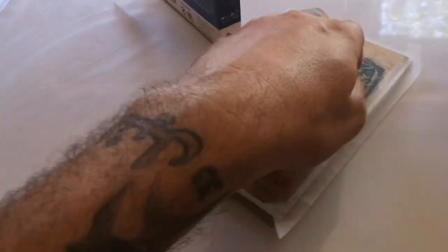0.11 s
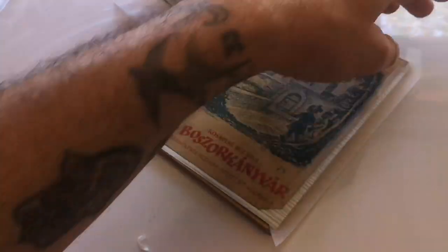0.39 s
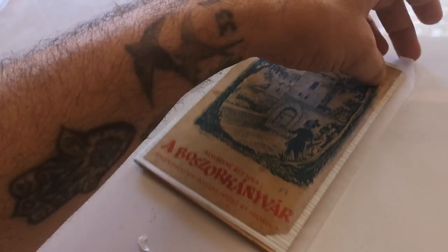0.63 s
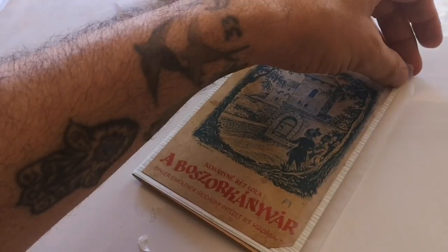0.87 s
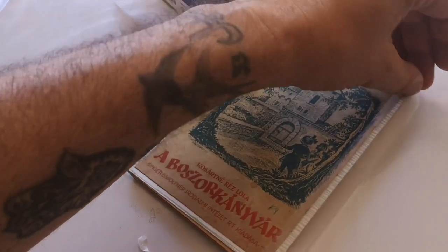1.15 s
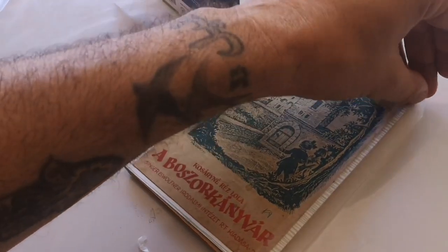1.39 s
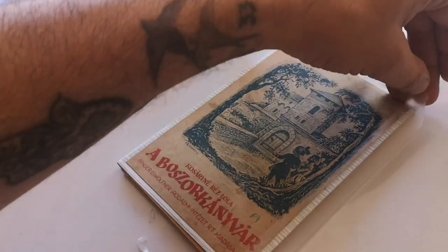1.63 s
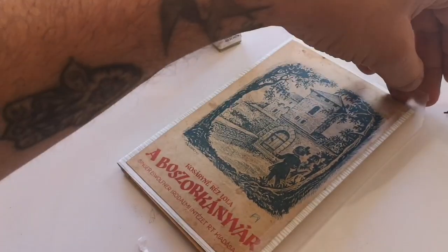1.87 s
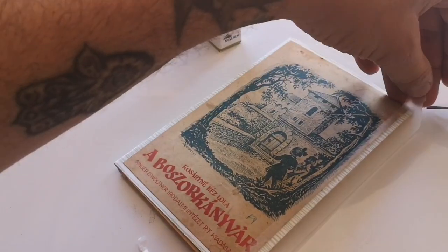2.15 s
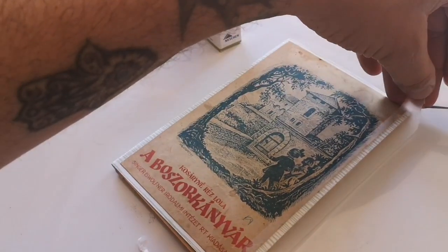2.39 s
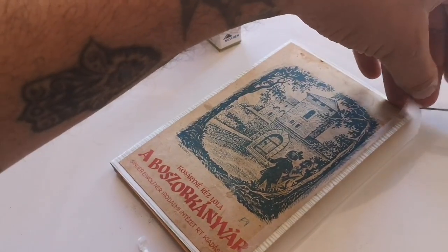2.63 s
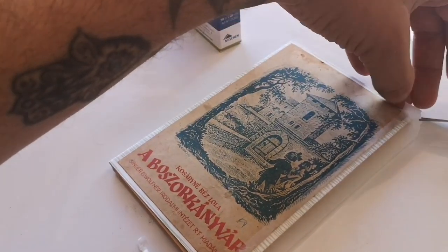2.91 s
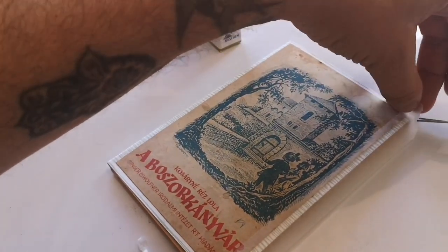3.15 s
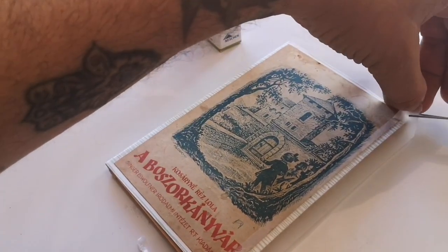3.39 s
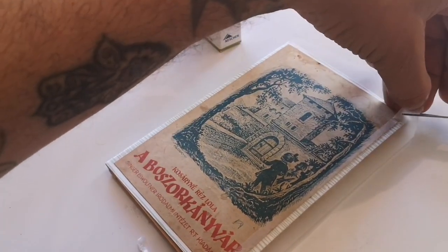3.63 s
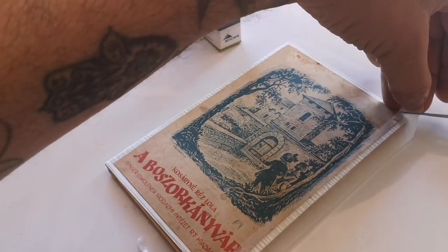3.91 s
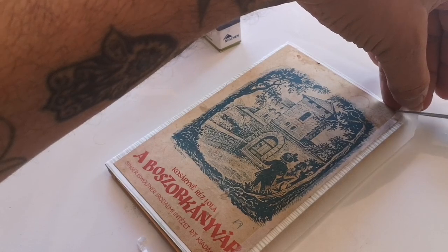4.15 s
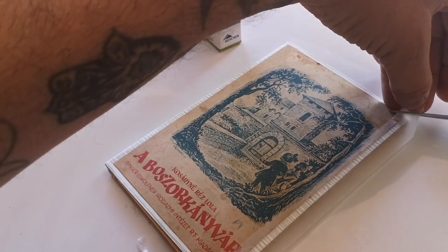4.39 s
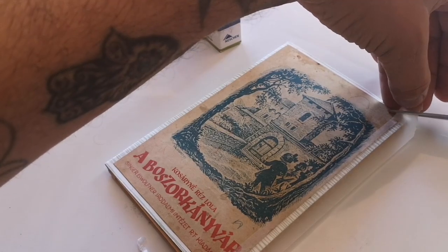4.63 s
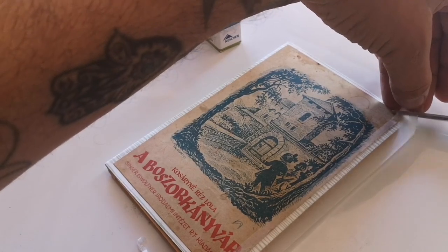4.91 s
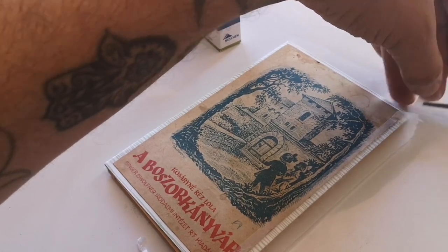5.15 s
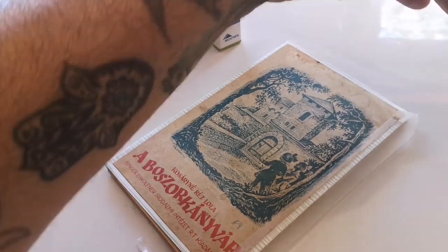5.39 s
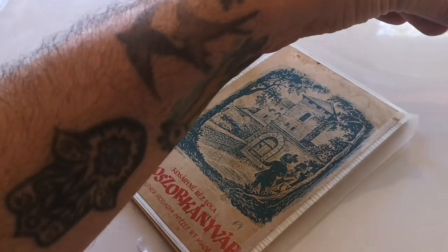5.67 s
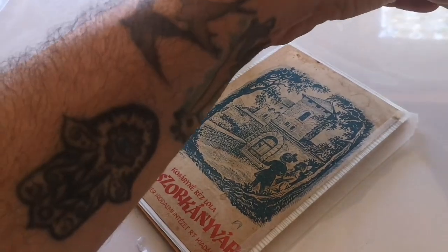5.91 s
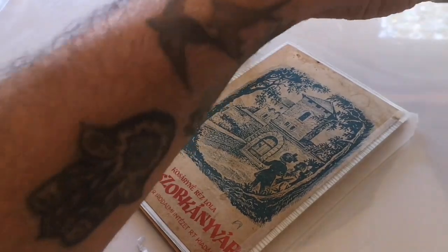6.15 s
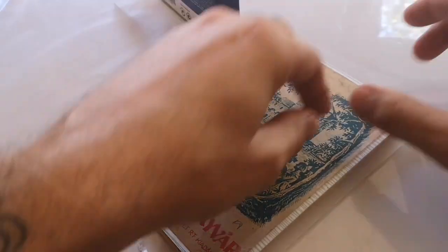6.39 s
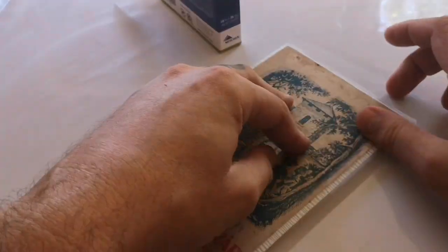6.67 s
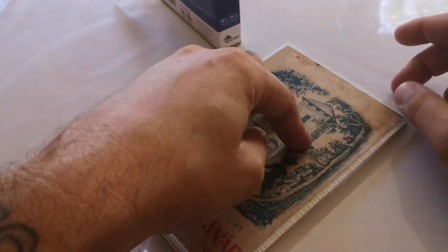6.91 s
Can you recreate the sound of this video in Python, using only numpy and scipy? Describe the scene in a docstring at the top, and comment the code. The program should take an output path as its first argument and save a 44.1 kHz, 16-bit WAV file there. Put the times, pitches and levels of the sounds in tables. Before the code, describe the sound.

Hands knock and shift a covered book on a hard table, then near silence, small sticky tape ticks, and another short flurry of knocks.

```python
"""Ticks and knocks over a steady quiet hiss and a wavering hum: hands fold paper tape round a book
on a hard table, close to a two-port microphone in a small room. Knocks ring modes of table, cover
and edge; glue ticks are short noise cracks; hand strokes swell rumble, slide and rustle noise.
Near sounds get a noise-tail room; behind lie shaped-noise hiss, narrow-band hum, dull far thumps."""
import sys
import numpy as np
from scipy import signal
from scipy.fft import rfft, irfft
from scipy.io import wavfile
from scipy.ndimage import uniform_filter1d

SR = 44100
rng = np.random.default_rng(int(sys.argv[2]) if len(sys.argv) > 2 else 0)


def volts(x):
    """Linear amplitude factor 10**(x/20) for a level x in dB, scalar or array-like."""
    e = np.asarray(x, float) / 20
    return 10 ** e


def put_to_file(sound):
    """Save the sound as 16-bit audio at rate SR, in the file named by the first command-line argument."""
    columns = np.atleast_2d(sound).T  # one column per channel
    safe = np.clip(columns, -1, 1)
    whole_steps = np.round(safe * 32767)
    wavfile.write(sys.argv[1], SR, whole_steps.astype(np.int16))


N = 310023

# knocks on book and table: t/s, level/dB, hardness (0 flat on cover, 1 hard edge),
# table thud re knock/dB, pitch ratio of the spot
KNOCK_EVENTS = [(0.083, -46.5, 0.3, -17, 0.9), (0.127, -48, 0.049, -3.5, 1.03),
                (0.154, -43.5, 0.027, -5, 0.97), (0.212, -28, 0.25, -9.5, 0.87),
                (0.471, -29.5, 0.9, -38, 0.61), (0.495, -33.5, 0.067, -22, 1),
                (0.506, -35.5, 0.042, 2, 1.8), (0.5217, -7.5, 0.29, -15.5, 0.98),
                (0.539, -24, 0.16, -6.5, 0.94), (0.649, -31.5, 0.035, -4.5, 1.2),
                (0.6819, -8.5, 0.9, -21, 1.13), (0.697, -13.5, 0.96, -17, 0.87),
                (0.945, -25.5, 0.93, -37.5, 1.29), (0.983, -44.5, 0.14, -5, 0.95),
                (1.9856, -31, 0.046, -5.5, 0.99), (2.135, -39.5, 0.094, -7, 1.09),
                (2.987, -30, 0.28, -6.5, 1.09), (4.228, -52, 0.27, -7, 0.89),
                (4.546, -57.5, 0.096, -17, 1.1), (4.621, -51, 0.04, -25, 1.93),
                (5.079, -31.5, 0.61, -22, 1.05), (5.4264, -16, 0.17, -8.5, 0.93),
                (5.439, -28.5, 0.21, -12.5, 0.97), (5.599, -30.5, 0.42, -11.5, 0.97),
                (5.617, -33.5, 0.51, -9, 0.98), (5.683, -33.5, 0.46, -16, 1.13),
                (5.7177, -12, 0.53, -8.5, 0.99), (5.726, -17, 0.09, -17, 1.5),
                (5.836, -33.5, .02, -11, 1.1), (5.85, -33.5, 0.073, -8.5, 0.99),
                (5.868, -44.5, 0.076, -9.5, 0.92), (6.622, -44.5, 0.85, -34, 1.32),
                (6.707, -42, 0.058, -2, 1.09), (6.847, -43.5, 0.024, 5.5, 0.9)]
# glue letting go: t/s, level/dB, centre f/Hz
TICK_EVENTS = [(0.045, -49, 4750), (0.9445, -18.5, 5780), (1.413, -39.5, 3110), (1.417, -39.5, 3530),
               (1.579, -36.5, 10400), (1.5957, -44, 9900), (1.634, -40, 9900), (2.616, -41.5, 9700),
               (2.667, -47, 7530), (3.3017, -49, 8200), (3.3233, -38, 8720), (3.36, -39, 9850),
               (3.4153, -43.5, 8910), (4.248, -51, 9000), (4.341, -50, 9520), (4.492, -53.5, 8500),
               (4.524, -53.5, 7960), (4.621, -47.5, 9840), (5.0012, -39, 5400), (5.005, -36.5, 9050),
               (5.0451, -29.5, 9140), (5.0704, -24.5, 6260), (5.0744, -26.5, 9300), (5.358, -32.5, 10240),
               (6.8945, -43, 6020)]
# hand strokes: t/s, length/s, level/dB, pressure (0 brushing, 1 shoving the book)
HAND_STROKES = [(0.084, 0.14, -51, 0.91), (0.197, 0.097, -52, 0.66), (0.306, 0.094, -58, 0.21),
                (0.456, 0.019, -42.5, 0.29), (0.483, 0.074, -46, 0.95), (0.513, 0.18, -45, 0.69),
                (0.68, 0.11, -41, 0.43), (0.803, 0.13, -60, 0.71), (0.937, 0.0077, -46, 0.29),
                (0.945, 0.067, -50, 0.91), (1.409, 0.031, -57.5, 0.18), (1.523, 0.27, -69, 0.041),
                (2.526, 0.24, -72, 0.097), (3.199, 0.45, -76, 0.079), (4.349, 0.034, -66, 0.53),
                (5.059, 0.017, -39, 0.23), (5.08, 0.034, -49.5, 0.89), (5.179, 0.093, -60, 0.32),
                (5.221, 0.012, -56, 0.26), (5.567, 0.14, -57, 0.83), (5.713, 0.1, -48.5, 0.72),
                (5.721, 0.036, -37.5, 0.92), (6.587, 0.1, -52.5, 0.85), (6.67, 0.28, -63.5, 0.39),
                (6.857, 0.13, -57, 0.66)]
# where the hands are: t/s, left port later by/ms, left minus right level/dB
HAND_PLACE = [(0, 0.38, -4), (1, .5, -1.5), (1.6, 0.2, -1), (3.2, .1, 4), (3.6, -0.74, -13),
              (4.8, -0.36, 6.5), (5, 0.8, -1), (5.5, .6, -2.5), (7, 0.37, -1)]
# far thumps: t/s
THUMP_TIMES_S = [1.72, 3.14, 3.77]
# modes of table top, book cover, hard edge: f/Hz, relative level/dB, t60/s
TABLE_MODES = [(165, 4.5, 0.054), (191.2, -5, 0.032), (271.4, 3, 0.037), (378, -2, 0.052),
               (480, -12.5, 0.01)]
COVER_MODES = [(520, -14, .010), (920, 0, .013), (1170, 0, .011), (1820, -8, .009)]
EDGE_MODES = [(1900, 0, .009), (2300, -1, .008), (2700, 0, .008), (3200, -4, .006), (3800, -8, .005)]
# stroke drive of rumble, slide, rustle (rows): best pressure, level there/dB, loss per unit away/dB
STROKE_DRIVE = [(0.81, 3.5, 39.5), (0.51, 2.5, 41.5), (0.12, 0.5, 32.5)]
# spectra of table rumble, skin on cover, paper rustle, room hiss: f/Hz, relative density/dB
RUMBLE_SPECTRUM = [(25, 1.5), (55, 7), (150, -3.5), (300, -24.5), (500, -48)]
SLIDE_SPECTRUM = [(450, -10), (850, -8.5), (1100, 6), (1500, -9.5), (2200, -3.5), (3500, -17),
                  (6000, -22.5)]
RUSTLE_SPECTRUM = [(1760, -18), (3000, -20.5), (4590, -3.5), (7280, -2), (8880, -9.5), (9780, 0.5),
                   (13300, -15), (15500, -44.5)]
AIR_SPECTRUM = [(12, -36), (20, 0.5), (85, -5.5), (166, -19), (207, -13.5), (282, -16.5), (393, -23.5),
                (800, -22.5), (2050, -18.5), (6540, -29.5), (9930, -36.5), (15500, -48)]
# likeness of the hiss at the two ports: f/Hz, left-right correlation
AIR_CORRELATION = [(60, 1), (200, 0.62), (400, -0.21), (700, -0.85), (1300, 0.035), (2400, -0.076)]

CHATTER_DECAY_S, CHATTER_RISE_S = 0.0043, 0.0011  # surfaces rattle after first contact
FLAT_CONTACT_S, EDGE_CONTACT_S = 0.00018, 0.00008  # a flat blow pushes longer, so it is duller
CRACK_FLAT_DB, CRACK_EDGE_DB = -12.5, -3  # crack re blow
CRACK_TOP_HZ = 11300
SLAP_S, SLAP_DB = 0.0007, -5
TICK_BODY_HZ, TICK_BODY_DB = 2700, -6.5  # the paper under the tape answers each tick
EARLY_T60_S, LATE_T60_S, LATE_DB = 0.2, 0.36, -7  # near surfaces die fast, room lingers below
WALLS_ANSWER_S = 0.022  # build-up as the first walls answer
ROOM_DB, ROOM_LOW_HZ, ROOM_TOP_HZ = -11, 200, 9000  # level ahead of the band-pass
AIR_DB = -67
HUM_HZ, HUM_WIDTH_HZ, HUM_DB = 203, 4.2, -77.5
THUMP_DB = -63
MIC_TOP_HZ = 14500


def curve(table, at, log=False):
    """Table columns interpolated by straight lines, over log x if asked."""
    x, *columns = np.transpose(table)
    if log:
        return [np.interp(np.log(at), np.log(x), c) for c in columns]
    return [np.interp(at, x, c) for c in columns]


def level(x, db):
    """Scale to an rms level in dB."""
    return x * volts(db) / np.sqrt(np.mean(x ** 2))


def colour(x, spectrum):
    """Filter by an (f/Hz, gain/dB) spectrum."""
    hz = np.fft.rfftfreq(N, 1 / SR) + 1  # + 1 keeps the log finite
    return irfft(rfft(x) * volts(curve(spectrum, hz, log=True)[0]), N)


def pair(correlation):
    """Left and right noise with an (f/Hz, correlation) likeness, from mid and side power."""
    hz = np.fft.rfftfreq(N, 1 / SR) + 1
    c = np.clip(curve(correlation, hz, log=True)[0], -1, 1)
    mid, side = rfft(rng.standard_normal((2, N))) * np.sqrt([(1 + c) / 2, (1 - c) / 2])
    return irfft([mid + side, mid - side], N)


def walk(rate_hz):
    """Random levels held for 1 / rate_hz, slewed twice."""
    k = int(SR / rate_hz)
    held = np.repeat(rng.standard_normal(N // k + 1), k)
    return uniform_filter1d(uniform_filter1d(held, k), k)[:N]


def add(out, s, sound, apart, aside=1):
    """Mix in at both ports with the hands' lag and pan (aside=0: none); apart has opposite signs."""
    lag_ms, pan_db = curve(HAND_PLACE, s)
    for ch, sign in enumerate((aside, -aside)):
        i = int((s + sign * lag_ms / 2000) * SR)
        piece = (sound + sign * apart)[:N - i]
        out[ch, i:i + len(piece)] += volts(sign * pan_db / 2) * piece


def ring(modes, push, scatter_db, detune):
    """Push drives 0.2 s of decaying modes; each blow lands elsewhere, so shares vary. Peak 1."""
    t = np.arange(SR // 5) / SR
    hz, db, t60_s = np.transpose(modes)[:, :, None]
    chance = rng.standard_normal((2, len(modes), 1))
    gain = volts(db + scatter_db * chance[0])
    tones = gain * np.sin(2 * np.pi * hz * (1 + detune * chance[1]) * t)
    response = np.sum(tones * 1000. ** (-t / t60_s), axis=0)
    y = signal.fftconvolve(response, push)[:len(t)]
    return y / np.max(np.abs(y))


def burst(hz, width_ratio, t60_s, rise_s):
    """Two decaying band-noise cracks: common to the ports, and apart. Rms -5 dB before the envelope."""
    t = np.arange(SR // 5) / SR
    edges_hz = np.clip([hz / width_ratio, hz * width_ratio], 100, CRACK_TOP_HZ)
    band = signal.butter(2, edges_hz, "band", fs=SR, output="sos")
    y = signal.sosfilt(band, rng.standard_normal((2, len(t))))
    return level(y, -5.0) * 1000. ** (-t / t60_s) * np.clip(t / rise_s, 0, 1)


def blow(hard):
    """First contact plus a few ms of chatter; differenced, as a small surface radiates little bass."""
    t = np.arange(SR // 30) / SR
    rattle = np.exp(-t / CHATTER_DECAY_S) * np.clip(t / CHATTER_RISE_S, 0, 1)
    push = 0.1 * rng.standard_normal((2, len(t))) * rattle
    push[0, 15:31] -= 0.5 * np.hanning(16)  # first contact
    contact = int(SR * (FLAT_CONTACT_S + hard * (EDGE_CONTACT_S - FLAT_CONTACT_S))) + 1
    return np.diff(uniform_filter1d(uniform_filter1d(push, size=contact), size=contact))


def book_ring(push, hard, spot):
    """Cover and edge modes, mixed by the hardness of the contact."""
    cover = ring(COVER_MODES * spot, push, 1.5, 0.03)
    edge = ring(EDGE_MODES * spot, push, 1.5, 0.03)
    return (1 - hard) * cover + hard * edge


def knocks():
    """Each blow rings cover, edge and table, with a dry crack on top."""
    out = np.zeros((2, N))
    for s, db, hardness, thud_db, pitch in KNOCK_EVENTS:
        spot = np.array([pitch, 1, 1])
        hard = np.clip(hardness, 0, 1)
        near, other = [book_ring(push, hard, spot) for push in blow(hard)]
        # a flat contact squeezes the air out in one short pull
        slap = np.hanning(int(SLAP_S * SR))
        near[10:10 + len(slap)] -= (1 - hard) * volts(SLAP_DB) * slap
        crack_db = CRACK_FLAT_DB + hard * (CRACK_EDGE_DB - CRACK_FLAT_DB)
        crack = volts(crack_db) * burst(5600, 1.534, 0.019, 0.001)
        # ports are close together: mainly shorter waves differ
        apart = signal.lfilter(*signal.butter(2, 500, "high", fs=SR), other + crack[1])
        add(out, s, volts(db) * (near + crack[0]), 0.74 * volts(db) * apart)
        # large table top: slow answer, alike at both ports
        slow_push = -np.diff(np.hanning(SR // 350))
        thud = ring(TABLE_MODES * np.sqrt(1 / spot), slow_push, 1.5, 0.02)
        add(out, s, volts(db + thud_db) * thud, 0, aside=0)
    return out


def ticks():
    """Each release of glue is a bright crack of a few ms over a lower paper crack."""
    out = np.zeros((2, N))
    for s, db, hz in TICK_EVENTS:
        crack = volts(db) * burst(hz, 1.27, 0.012, 0.001)
        body = volts(db + TICK_BODY_DB) * burst(TICK_BODY_HZ, 2, 0.01, 0.001)
        crack = crack + body
        add(out, s, crack[0], 0.5 * crack[1])
    return out


def stroke_force():
    """Swell and fade of each stroke; its pressure sets the drive of rumble, slide and rustle."""
    force = np.zeros((3, N))
    best, best_db, lost_db = np.transpose(STROKE_DRIVE)
    for s, length_s, db, pressure in HAND_STROKES:
        i, n = int(s * SR), int(length_s * SR)
        swell = np.sin(np.pi * np.linspace(0, 1, n) ** 0.7) ** 0.5
        drive = volts(db + best_db - lost_db * np.abs(pressure - best))
        force[:, i:i + n] += (drive[:, None] * swell)[:, :N - i]
    return force


def table_rumble():
    """Low noise of the table under a stroke."""
    return level(colour(pair([(50, 1.0), (300, 0.35)]), RUMBLE_SPECTRUM), 0)


def skin_slide():
    """Skin sticks and slips on the cover: noise of jumpy level; octaves come and go as it moves."""
    jumps_db = 4.0 * walk(120) + 5.0 * walk(700)
    skin = volts(jumps_db) * pair([(100, 0.4), (10000, 0.3)])
    slide = np.zeros((2, N))
    for hz in 250 * 2 ** np.arange(5):
        octave = signal.lfilter(*signal.butter(2, [hz, 2 * hz], "band", fs=SR), skin)
        slide += volts(3.5 * walk(50)) * octave
    return level(colour(slide, SLIDE_SPECTRUM), 0)


def paper_rustle():
    """Paper fibres whisper in fine random grains, about 6000 a second."""
    grain_db = 2.2 * rng.exponential(size=N) + 4.0 * walk(90)
    grains = volts(grain_db) * (rng.random(N) < 6000 / SR)
    return level(colour(grains * pair([(100, 0.57), (10000, 0.44)]), RUSTLE_SPECTRUM), 0)


def hands():
    """Strokes gate table rumble, skin slide and paper rustle."""
    force = stroke_force()
    return force[0] * table_rumble() + force[1] * skin_slide() + force[2] * paper_rustle()


def room(x):
    """Decaying noise tail per port: builds up late, thinner and duller than the direct sound."""
    t = np.arange(SR // 2) / SR
    decay = 1000. ** (-t / EARLY_T60_S) + volts(LATE_DB) * 1000. ** (-t / LATE_T60_S)
    build_up = np.clip(t / WALLS_ANSWER_S, 0, 1) ** 2
    tail = pair([(250, 1.0), (600, 0.21)])[:, :len(t)] * decay * build_up
    tail = tail * volts(3.5 * walk(350)[:len(t)])  # echoes arrive in clumps
    tail = tail * volts(ROOM_DB) / np.sqrt(np.sum(tail[0] ** 2))
    tail = signal.lfilter(*signal.butter(1, [ROOM_LOW_HZ, ROOM_TOP_HZ], "band", fs=SR), tail)
    return signal.fftconvolve(x, tail, axes=1)[:, :N]


def hiss():
    """Steady shaped noise, alike at the ports only in the bass."""
    return level(colour(pair(AIR_CORRELATION), AIR_SPECTRUM), AIR_DB)


def hum():
    """Noise through a narrow resonance, so the tone wavers; same at both ports."""
    peak = signal.iirpeak(HUM_HZ, HUM_HZ / HUM_WIDTH_HZ, fs=SR)
    return level(signal.lfilter(*peak, rng.standard_normal(N)), HUM_DB)


def thumps():
    """Dull far thumps: two low modes under a soft push, cut at 0.2 s."""
    out = np.zeros((2, N))
    modes = [(282.3, -2, 0.58), (260, -3.5, 0.99)]  # f/Hz, level/dB, t60/s
    for s in THUMP_TIMES_S:
        thump = ring(modes, np.hanning(SR // 300), 0.49, 0.028)
        add(out, s, volts(THUMP_DB) * thump, 0, aside=0)
    return out


def background():
    """Sum of hiss, hum and far thumps."""
    return hiss() + hum() + thumps()


def scene():
    """Near sounds with their room, over the background."""
    near = knocks() + ticks() + hands()
    return near + room(near) + background()


def low_pass(x):
    """Removes everything above the highest recorded frequency."""
    return signal.sosfilt(signal.butter(12, 16550, fs=SR, output="sos"), x)


def record(dry):
    """The microphone rolls off at the top."""
    mix = signal.lfilter(*signal.butter(3, MIC_TOP_HZ, fs=SR), dry)
    return low_pass(mix)


dry = scene()
out = record(dry)
put_to_file(out)
```